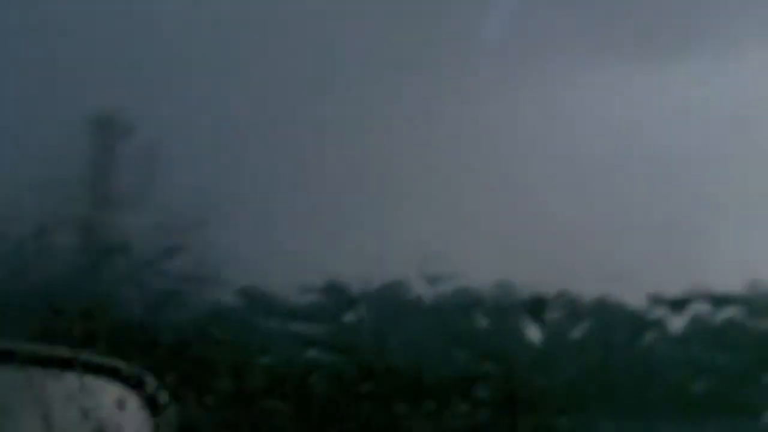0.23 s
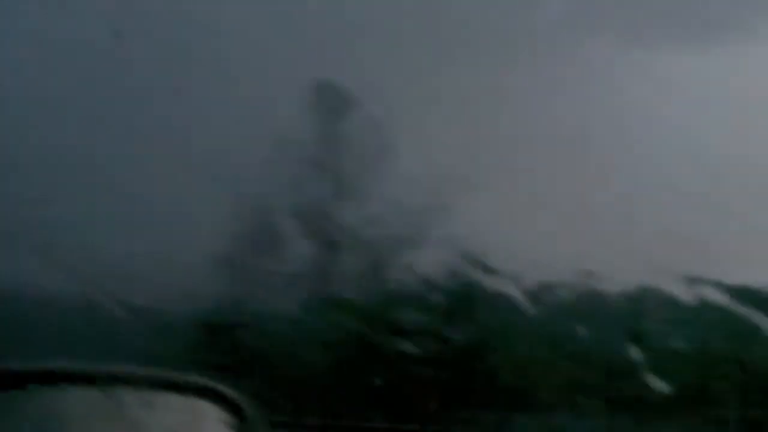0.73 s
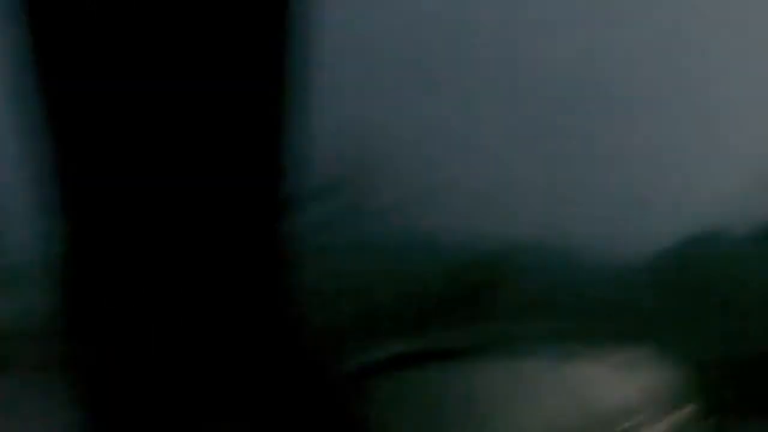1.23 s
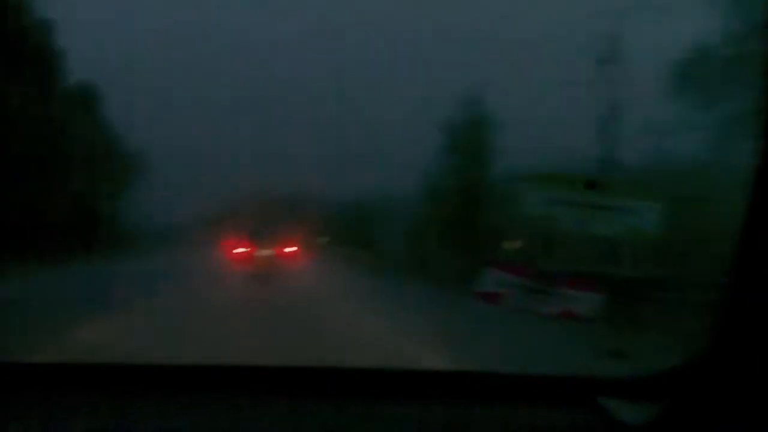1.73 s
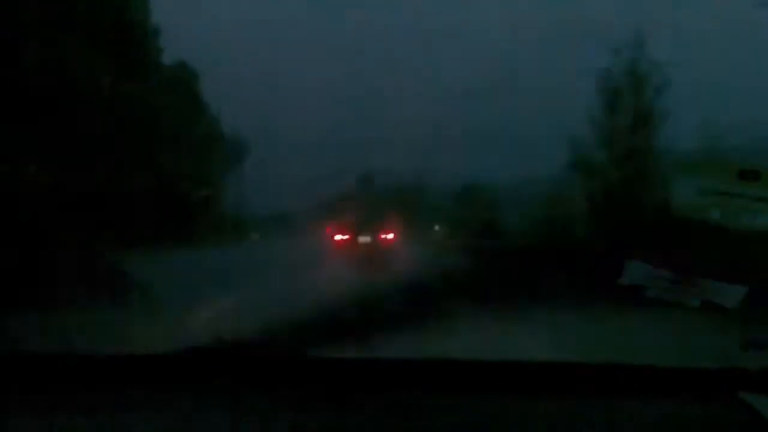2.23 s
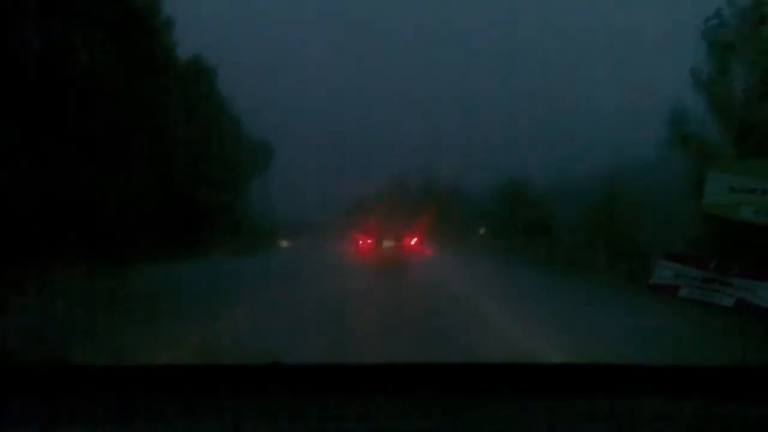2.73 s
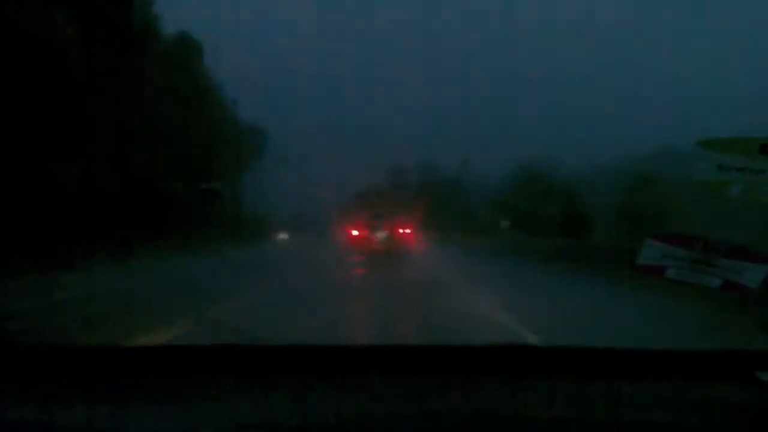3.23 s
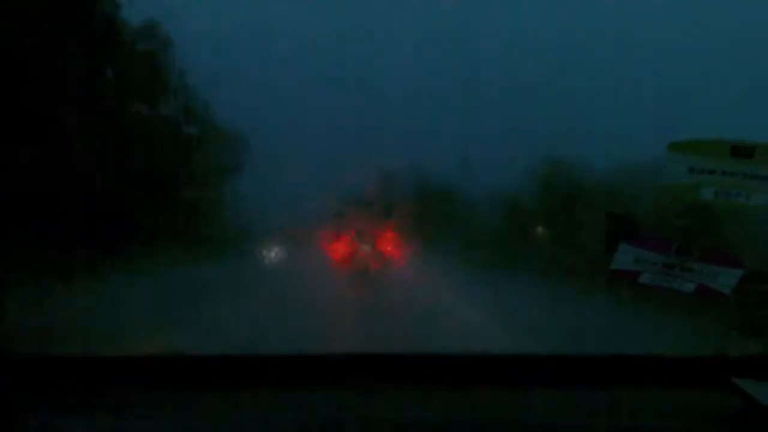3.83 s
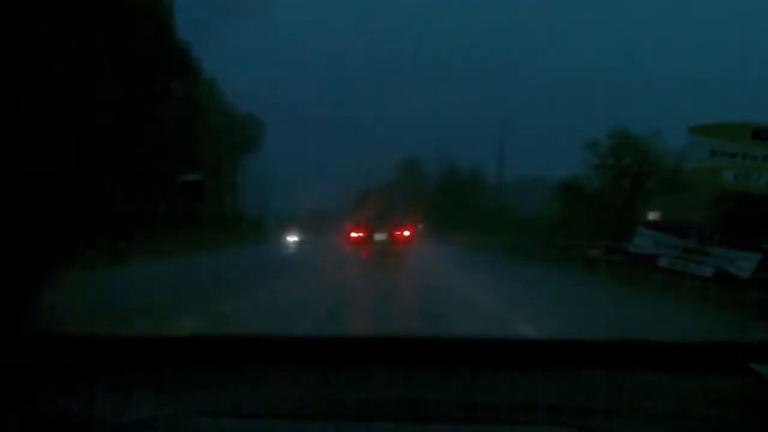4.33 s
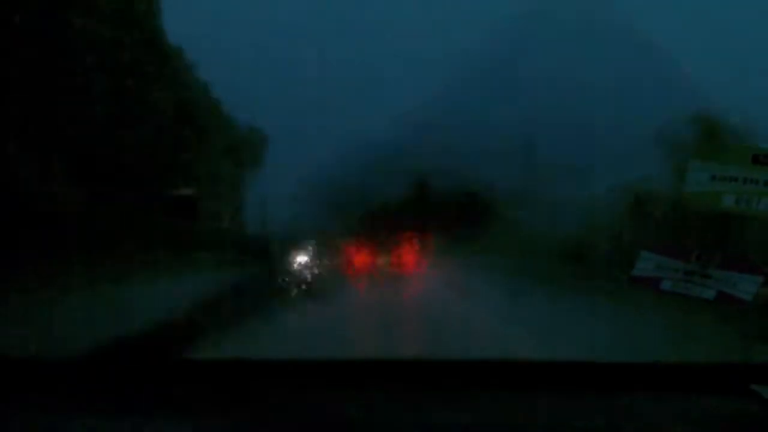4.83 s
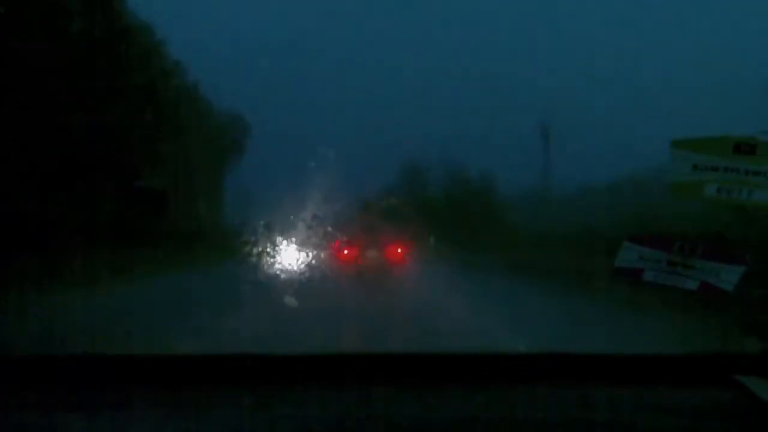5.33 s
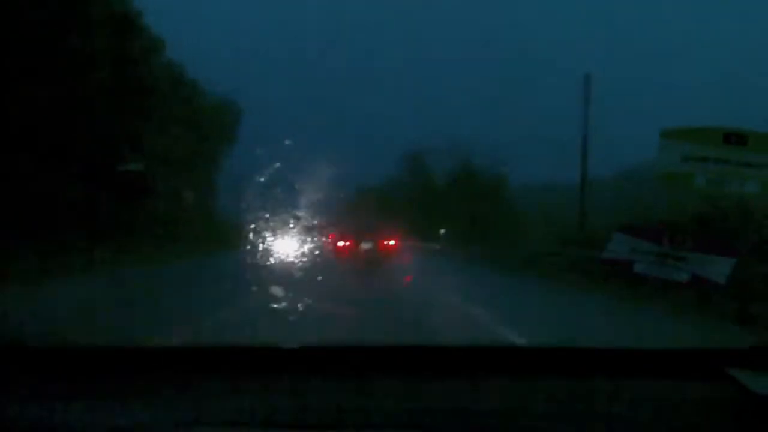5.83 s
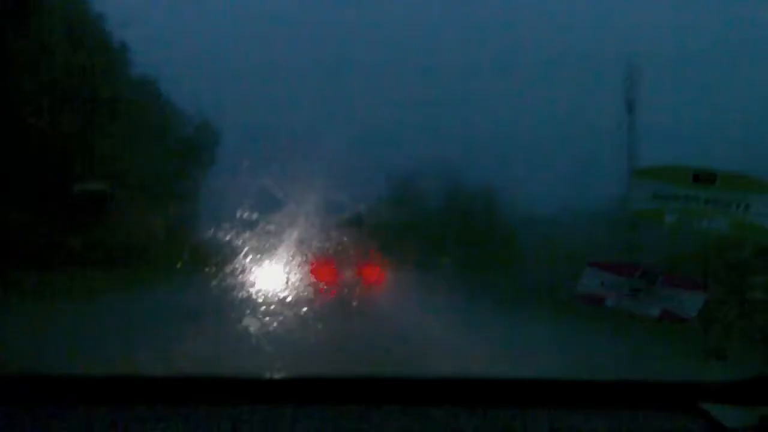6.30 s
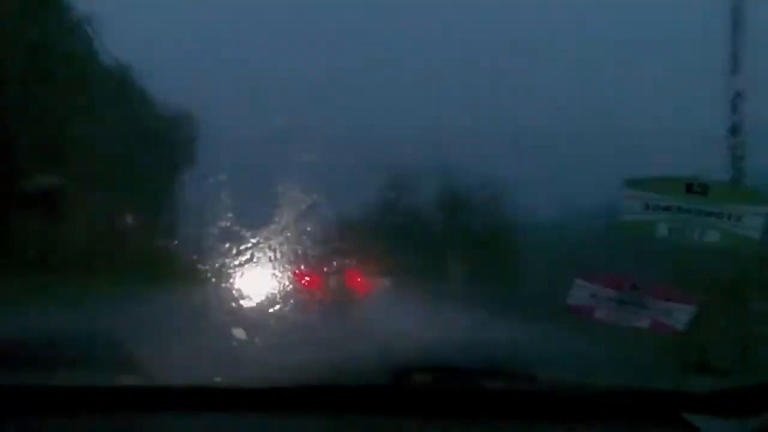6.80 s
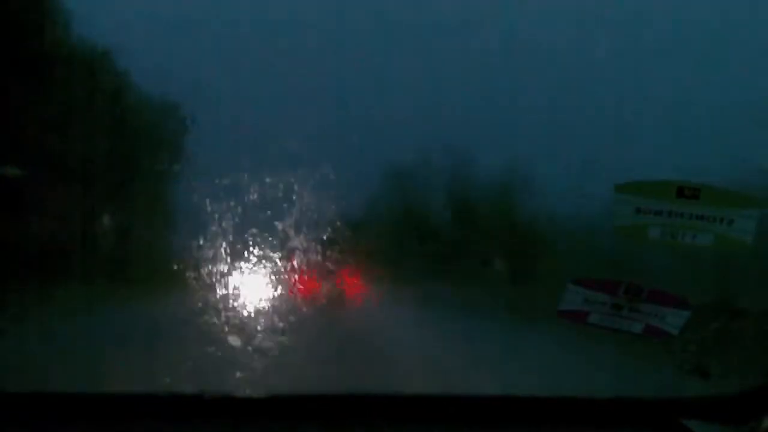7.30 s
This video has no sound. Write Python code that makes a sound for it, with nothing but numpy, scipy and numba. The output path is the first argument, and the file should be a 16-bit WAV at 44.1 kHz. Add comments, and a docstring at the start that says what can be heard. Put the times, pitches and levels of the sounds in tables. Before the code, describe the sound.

From a seat inside a slowly moving car, heavy rain roars on windshield and roof in quick uneven gusts. Small hailstones stand out constantly, with sharp glassy cracks and duller hollow thuds on the roof, irregular and crowded. A faint low road rumble lies underneath. The microphone is in the cabin, close to the panels, with treble cut off at the very top and loud peaks slightly softened.

```python
"""Sharp cracks and dull thuds of small hail stand out of heavy rain on a slowly moving car, heard from a seat inside.
Each blow sends a bending wave through glass or roof, treble first, and the panel rings out
within a few hundredths of a second. Rain is many chance blows over a hissing spray of shaped noise.
Gusts drive the fall in waves, and low noise makes the rumble of the road underneath."""
import sys
import numpy as np
from scipy import signal
from scipy.fft import rfft, irfft
from scipy.io import wavfile
from scipy.ndimage import uniform_filter1d
from numba import njit

SR = 44100
rng = np.random.default_rng(int(sys.argv[2]) if len(sys.argv) > 2 else 0)


def boost_factor(decibels):
    """Convert a level in decibels to a linear amplitude factor."""
    exponent = np.asarray(decibels, float) / 20
    return 10 ** exponent


def put_to_file(sound):
    """Save the sound as 16-bit audio at rate SR, in the file named by the first command-line argument."""
    columns = np.atleast_2d(sound).T  # one column per channel
    safe = np.clip(columns, -1, 1)
    whole_steps = np.round(safe * 32767)
    wavfile.write(sys.argv[1], SR, whole_steps.astype(np.int16))


N = 333356  # length in samples

# How strongly each pitch reaches the microphone from the glass.
# Each row: frequency in Hz, relative level in dB per Hz.
GLASS_TONE = [(300, -34.5), (700, -7.5), (1300, -4.5), (2100, -3), (2700, 0), (3400, -1), (4200, -2.5),
              (5200, -6), (7000, -9), (9700, -9.5), (11000, -12.5)]
# The same for the roof. Each row: frequency in Hz, relative level in dB per Hz.
ROOF_TONE = [(120, -36), (250, -28.5), (340, -12), (440, 1), (700, 2.5), (1200, 2), (1550, -2),
             (3000, -21.5)]


def colour(x, points):
    """Filter through (Hz, dB) points that answers only after its input (minimum phase)."""
    size = 2048
    hz, db = np.transpose(points)
    log_hz = np.log(np.maximum(np.arange(size // 2 + 1) * SR / size, 1))
    below = np.maximum(np.log(hz[0]) - log_hz, 0)
    above = np.maximum(log_hz - np.log(hz[-1]), 0)
    # the level falls away on both sides of the given points
    gain_db = np.interp(log_hz, np.log(hz), db) - 12 * (below + above)
    # folding the cepstrum of the log gain moves all of the response after time zero
    cepstrum = irfft(np.log(boost_factor(gain_db)))
    folded = np.r_[cepstrum[0], 2 * cepstrum[1:size // 2], np.zeros(size // 2)]
    response = irfft(np.exp(rfft(folded)))
    return signal.oaconvolve(x, response)[:len(x)]


def unit(x):
    """Scale to an rms (average strength) of 1."""
    return x / np.sqrt(np.mean(x ** 2))


def walk(rate):
    """Slow random wandering with rms 1: rate new levels a second, smoothed twice."""
    hold = int(SR / rate)
    steps = np.repeat(rng.standard_normal(N)[:N // hold + 1], hold)
    return unit(uniform_filter1d(uniform_filter1d(steps, hold), hold)[:N])


def fall_db(s):
    """Level of the whole fall in dB at times s, rising and sinking with the gusts."""
    # Gusts. Each row: time in seconds, level of the whole fall in dB.
    gusts = [(0.0, -23.5), (0.08, -19), (0.16, -21), (0.36, -20.5), (0.5, -18.5), (0.76, -20),
             (1.12, -16.5), (1.22, -22), (1.35, -21.5), (1.62, -17.5), (1.77, -25.5), (1.91, -19),
             (2.05, -23.5), (2.14, -18), (2.27, -18.5), (2.54, -16), (2.9, -22.5), (3.0, -18),
             (3.12, -19.5), (3.34, -16.5), (3.6, -20), (3.76, -24), (4.04, -16.5), (4.12, -21.5),
             (4.2, -18), (4.28, -24), (4.38, -20), (4.48, -26), (4.6, -18.5), (4.85, -19), (5.15, -17.5),
             (5.27, -21.5), (5.4, -16.5), (5.6, -20.5), (5.74, -17.5), (6.1, -19.5), (6.2, -23),
             (6.32, -18), (6.7, -20), (6.8, -17), (7.15, -19.5), (7.56, -19)]
    return np.interp(s, *np.transpose(gusts))


@njit
def ring(hz, start, size, fade, front, front_fade):
    """Sum of decaying modes, each with its own start; a quick front rides on a slower ring."""
    out = np.zeros(3000)
    for k in range(len(hz)):
        turn = np.exp(2j * np.pi * hz[k] / SR)
        slow, quick = size[k] + 0j, front + 0j
        slow_step, quick_step = turn * fade[k], turn * front_fade[k]
        for i in range(start[k], len(out)):
            out[i] += slow.imag + quick.imag
            slow *= slow_step
            quick *= quick_step
            if abs(slow.real) + abs(slow.imag) + abs(quick.imag) < 1e-3:
                break
    return out


def spot(points, travel_s, front, modes_db, scatter_s):
    """Answer of a panel to a blow at one place, energy 1: many modes that start late at low pitch."""
    # Strongest panel and cabin modes.
    # Each row: frequency in Hz, level in dB before modes_db is added, time to fade by 60 dB in seconds.
    strong_modes = np.array([(435, -3, .11), (528, 0, .14), (700, 1, .12), (900, -4, .09), (1090, -2, .1),
                             (1300, -5, .08)])
    # Ring of the many weak modes. Each row: frequency in Hz, time to fade by 60 dB in seconds.
    weak_ring = np.array([(300, 0.1), (1000, 0.075), (2800, 0.065), (7000, 0.034), (11000, 0.02)])
    chance = rng.random((3, 400))
    weak_hz = 250 + 11000 * chance[0, len(strong_modes):] ** 1.5
    hz = np.r_[weak_hz, strong_modes[:, 0]]
    t60 = np.interp(np.log(hz), np.log(weak_ring[:, 0]), weak_ring[:, 1])
    size = np.sqrt(hz ** (1 / 3) / t60) * rng.standard_normal(len(hz))
    strong = slice(-len(strong_modes), None)
    t60[strong] = strong_modes[:, 2]
    size[strong] *= boost_factor(modes_db + strong_modes[:, 1])
    # bending waves travel with the root of frequency; the first front arrives in step
    late_s = travel_s * (.5 + chance[1, 0]) * np.sqrt(1000 / hz)
    fade = np.exp(-np.log(1000) / (t60 * SR))
    front_size, front_fade = front * abs(size).mean(), np.exp(-hz / SR / 2)
    answer = ring(hz, (late_s * SR).astype(int), size, fade, front_size, front_fade)
    # the stone or drop breaks up: splinters land again just after it
    splinters = np.zeros(1000)
    landing = np.minimum(chance[2, :5] * scatter_s * SR, 999).astype(int)
    splinters[landing] = .45 * chance[2, 5:10]
    splinters[0] = 1
    answer = colour(signal.fftconvolve(answer, splinters), points)
    return answer / np.sqrt(np.sum(answer ** 2))


def drops(points, rate, spread_db, travel_s, front, modes_db, scatter_s, count):
    """Chance blows, rate a second in all, over count places of a panel; few large, most small."""
    out = np.zeros(N)
    for _ in range(count):
        hits = rng.random(N) < rate / count / SR
        blows = hits * boost_factor(spread_db * np.minimum(rng.exponential(size=N), 4))
        out += signal.oaconvolve(blows, spot(points, travel_s, front, modes_db, scatter_s))[:N]
    return unit(out)


def road():
    """Low rumble of tyres and body: shaped noise that wavers a little."""
    # Tone of the rumble. Each row: frequency in Hz, relative level in dB.
    tone = [(40, -1.5), (120, -4.5), (200, -3), (300, 3), (450, -3)]
    # Swell of the rumble. Each row: time in seconds, change from the base level in dB.
    swell = [(0, 2.5), (1.1, 4.5), (1.25, 0), (2.3, -0.5), (3.6, -2), (5.3, -1.5), (7.56, 1.2)]
    base_db = -45
    swell_db = np.interp(np.arange(N) / SR, *np.transpose(swell))
    rumble = unit(colour(rng.standard_normal(N), tone))
    return boost_factor(base_db + swell_db + 0.83 * walk(3.6)) * rumble


def rain():
    """Drops ring glass and roof over a fine spray; the gusts flutter from one moment to the next."""
    gust_db = fall_db(np.arange(N) / SR)
    glass_db = gust_db - 2
    roof_db = gust_db - 5.5 + 0.5 * walk(12)  # the roof drifts on its own
    flutter_db = 0.86 * walk(40) + 0.67 * walk(13)
    glass = drops(GLASS_TONE, rate=700, spread_db=3.5, travel_s=.0008, front=2.74,
                  modes_db=-6, scatter_s=.002, count=24)
    spray = unit(colour(rng.standard_normal(N), GLASS_TONE))
    roof = drops(ROOF_TONE, rate=300, spread_db=1.5, travel_s=0.00196, front=1.02,
                 modes_db=4, scatter_s=0.00416, count=12)
    on_glass = boost_factor(glass_db + flutter_db) * (glass + boost_factor(-6.5) * spray)
    on_roof = boost_factor(roof_db + 0.23 * flutter_db) * roof
    return on_glass + on_roof


def small_hail():
    """Rows (seconds, crack dB, thud dB) of smaller stones at chance times, driven harder in the gusts."""
    count, range_db = 260, 10
    when, crack, thud = rng.random((count, 3)).T
    s = when * N / SR
    # the loudest crack and thud against the whole fall, less a chance part of the range
    crack_db = fall_db(s) - 1 - range_db * crack
    thud_db = fall_db(s) - 4.5 - range_db * thud
    return np.c_[s, crack_db, thud_db]


def hail():
    """Each stone strikes one of many places: a crack from the glass and a thud from the roof."""
    # Largest hailstones, with levels before the final dulling filter.
    # Each row: start in seconds, crack level in dB, thud level in dB.
    large_hail = [(0.0639, -30, -18), (0.0748, -25, -26), (0.3642, -14, -34), (0.5049, -14.5, -16),
                  (0.5488, -11.5, -17), (0.6904, -14, -25), (0.7134, -13.5, -30), (0.861, -15, -21),
                  (0.9159, -10, -19), (1.0057, -18, -29), (1.1115, -11.5, -20), (1.333, -15, -13),
                  (1.3479, -10.5, -10.5), (1.5674, -36, -17), (1.6473, -15, -22), (1.6752, -26.6, -12),
                  (1.8278, -18, -40), (1.8658, -14, -38), (1.8997, -15.5, -34), (1.9466, -12, -13.5),
                  (2.1621, -13, -36), (2.3088, -15.5, -31), (2.4035, -15, -12.5), (2.4973, -12, -19),
                  (2.5861, -12.5, -21), (2.656, -15, -16), (2.6689, -17, -31), (2.7318, -13, -12.5),
                  (2.9842, -10.5, -33), (3.0211, -26, -15.5), (3.062, -14, -32), (3.2237, -13, -16),
                  (3.3474, -14.5, -13), (3.515, -14.5, -20), (3.5928, -13, -19.5), (3.8034, -11, -17),
                  (3.958, -11, -18), (4.0578, -11, -12), (4.0707, -16, -13), (4.1805, -13.5, -16),
                  (4.3042, -11.5, -26), (4.6704, -32.5, -11.5), (4.7193, -9.5, -39), (4.7402, -15, -16),
                  (4.7692, -15, -27), (4.8909, -20, -10.5), (4.9088, -30, -21), (5.0675, -15, -29.8),
                  (5.1293, -14, -18), (5.279, -6.5, -11.5), (5.3937, -19, -15.5), (5.4486, -32, -20),
                  (5.6462, -12, -13), (5.6641, -13, -26), (5.8298, -19, -22), (6.139, -18, -10.5),
                  (6.2897, -14, -13.5), (6.3885, -16, -7.5), (6.5302, -14, -15), (6.7407, -33, -14),
                  (6.7856, -14, -25), (6.9572, -13.5, -32), (6.9702, -21, -12.5), (7.0111, -12, -23),
                  (7.2296, -12, -17), (7.3004, -11, -11.5), (7.3413, -10, -15), (7.3852, -12, -27),
                  (7.4381, -32, -16)]
    first_s = .012  # a level is the energy of the whole blow spread over this time
    cracks = [spot(GLASS_TONE, travel_s=.001, front=1.95, modes_db=-9, scatter_s=.007) for _ in range(32)]
    thuds = [spot(ROOF_TONE, travel_s=0.002984, front=0.92, modes_db=4.5, scatter_s=0.0083)
             for _ in range(32)]
    out = np.zeros(N + SR)
    for k, (s, crack_db, thud_db) in enumerate(np.r_[large_hail, small_hail()]):
        crack = boost_factor(crack_db) * cracks[k % len(cracks)]
        thud = boost_factor(thud_db) * thuds[k % len(thuds)]
        blow = (crack + thud) * np.sqrt(first_s * SR)
        start = int(s * SR)
        out[start:start + len(blow)] += blow
    # a stone stays on the panel longer than a drop, which dulls its treble
    return colour(out[:N], [(20, -5.0), (3500, -4.0), (6000, -7.5), (15000, -6.5)])


def scene():
    """All sources at the one microphone."""
    return (road() + rain() + hail())[None]


def roll_off(x):
    """The treble ends steeply here."""
    return signal.sosfilt(signal.butter(12, 11570, fs=SR, output="sos"), x)


def record(dry):
    """A narrow dip in the treble, a steep top cut and softly rounded peaks."""
    dip_hz, dip_width_hz, dip_depth = 7880, 300, .8
    top_hz = 10800
    narrow_band = signal.lfilter(*signal.iirpeak(dip_hz, dip_hz / dip_width_hz, fs=SR), dry)
    dipped = dry - dip_depth * narrow_band
    top_cut = signal.ellip(12, .3, 75, top_hz, fs=SR, output="sos")
    cut = signal.sosfilt(top_cut, dipped)
    rounded = np.tanh(.85 * cut) / .85
    # the rounding makes new treble, which the same cut removes again
    mix = signal.sosfilt(top_cut, rounded)
    return roll_off(mix)


dry = scene()
out = record(dry)
put_to_file(out)
```